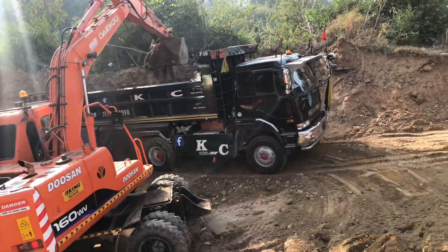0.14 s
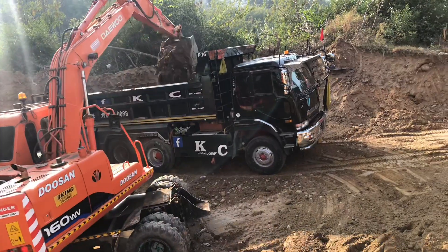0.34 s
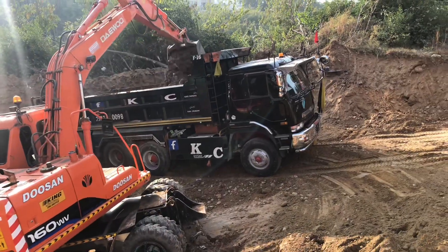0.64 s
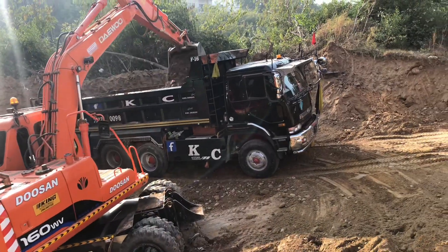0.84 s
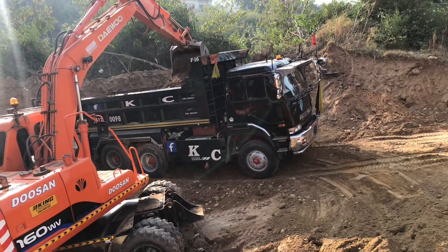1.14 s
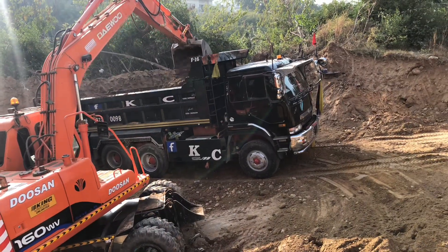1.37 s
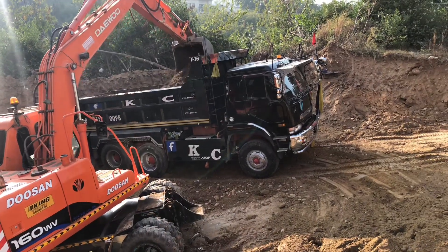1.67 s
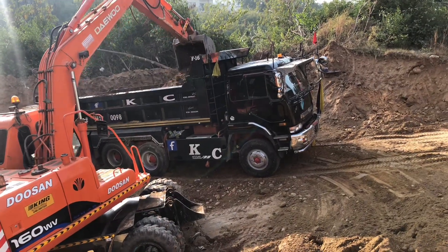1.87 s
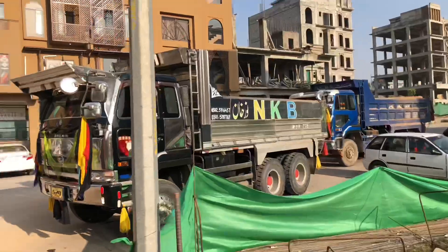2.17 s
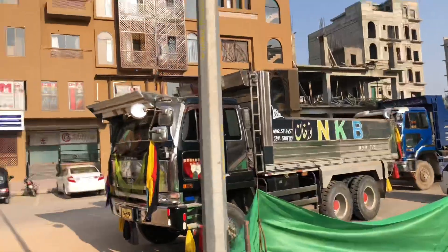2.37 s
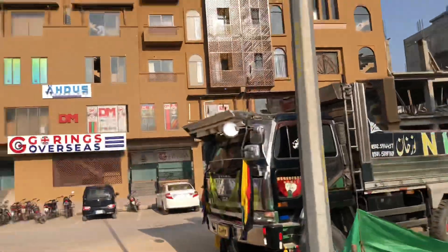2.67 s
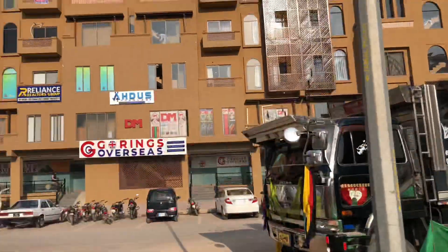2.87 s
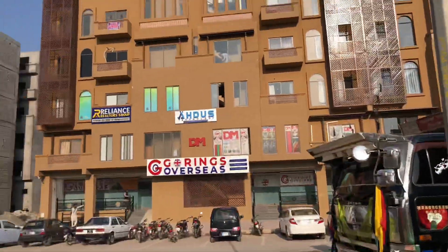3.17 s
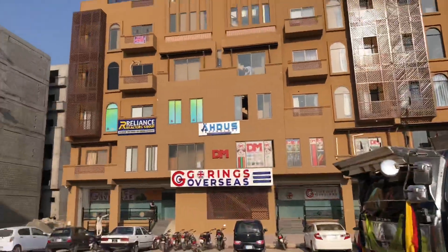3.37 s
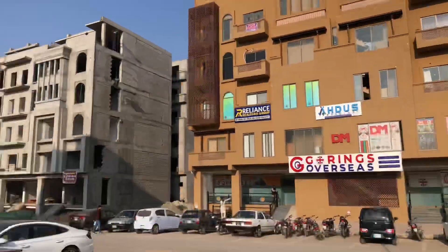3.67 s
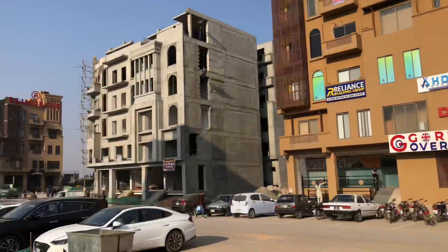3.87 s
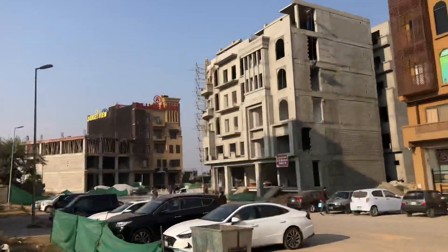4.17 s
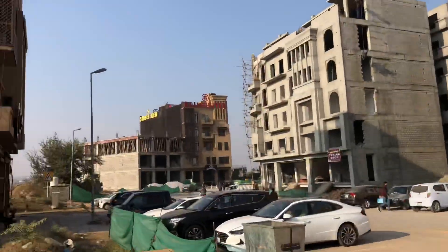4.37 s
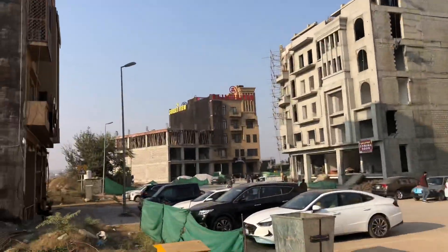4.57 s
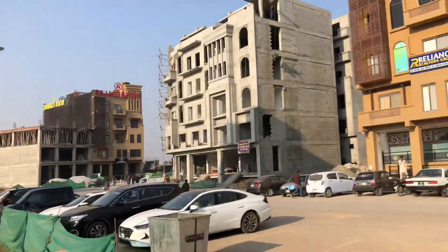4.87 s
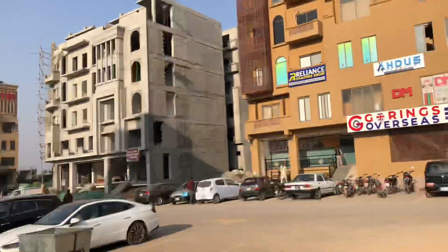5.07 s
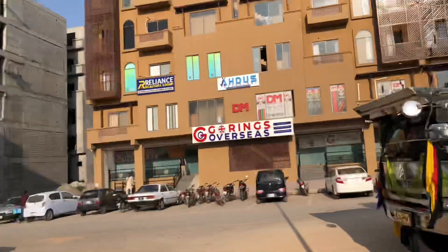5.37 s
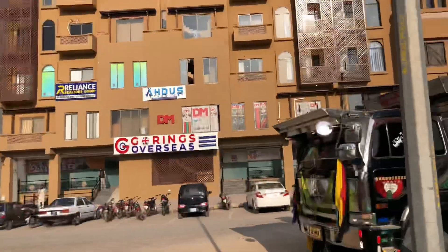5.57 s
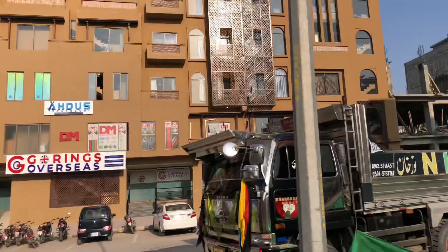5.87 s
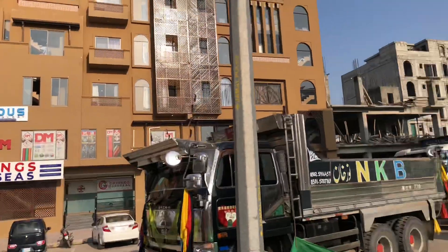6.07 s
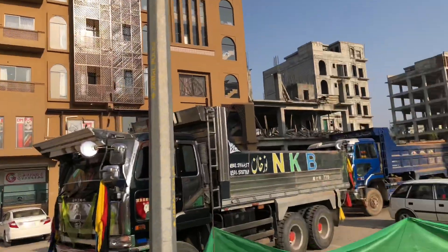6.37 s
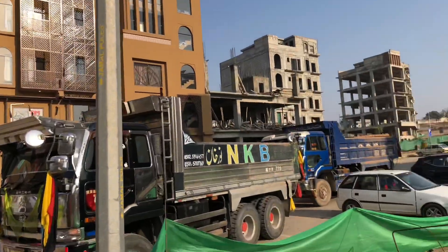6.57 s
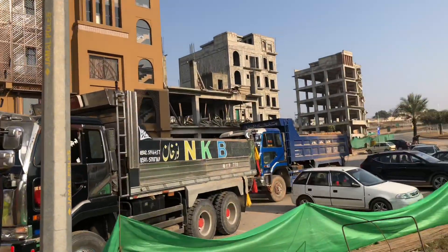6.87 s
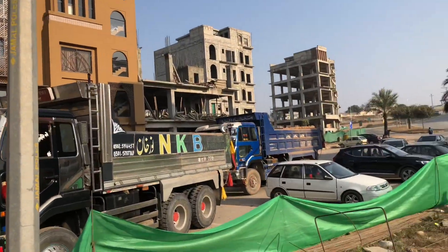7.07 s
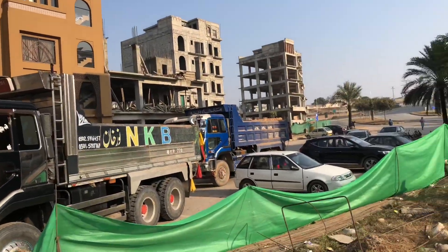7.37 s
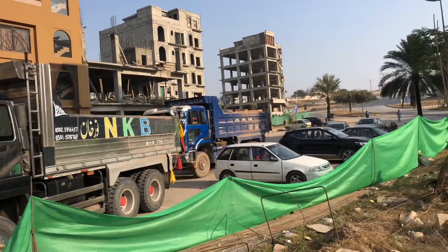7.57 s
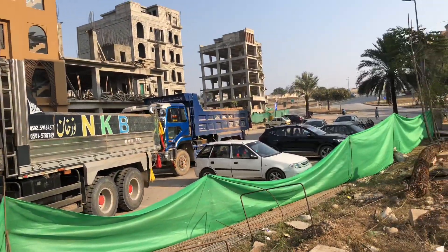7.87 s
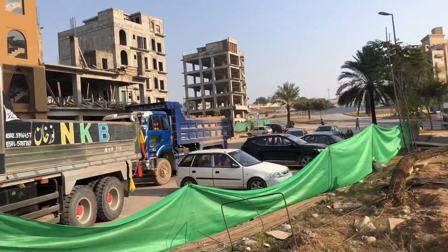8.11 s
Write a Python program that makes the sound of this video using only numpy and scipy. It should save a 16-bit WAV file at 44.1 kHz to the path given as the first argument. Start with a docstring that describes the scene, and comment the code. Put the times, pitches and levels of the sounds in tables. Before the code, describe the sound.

Outdoors at a digging site, a loud, hard-clattering excavator engine sags slightly as soil and rocks crash into a truck's metal bed, densest around one second. A hard cut follows. Then a more distant engine drones across a street, throbbing softly, beside another low motor that fades away. The turning microphone loses then regains the clatter, brightest near the end; thin hiss and small ticks stay faint behind.

```python
"""A wheeled excavator's six-cylinder diesel under load, close by, tips soil and stones into a steel truck bed.
After a very short silence the engine is heard from across a street, on a turning microphone.
Fluttering lines make exhaust, fan and hydraulic pump; noise bursts ringing the panels make the clatter,
which brightens as the microphone faces the machines. Decaying noise and modes make the falling load.
Behind are another motor that runs down and fades, a thin hiss, ticks, squeaks and a swell of clatter."""
import sys
import numpy as np
from scipy import signal
from scipy.fft import rfft, irfft, next_fast_len
from scipy.io import wavfile
from scipy.ndimage import uniform_filter1d, map_coordinates

SR = 44100
rng = np.random.default_rng(int(sys.argv[2]) if len(sys.argv) > 2 else 0)


def generate_wav(sig):
    """Save sig (samples, or channels by samples) to the path in sys.argv[1] as 16-bit PCM at SR."""
    pcm = np.round(np.clip(np.atleast_2d(sig).T, -1, 1) * 32767).astype(np.int16)
    wavfile.write(sys.argv[1], SR, pcm)


N = 363384
TIME = np.arange(N) / SR

# the two microphone places, close by and across the street: start_s, end_s
NEAR, FAR = (0, 2.013), (2.06, 8.24)

# engine speed, sagging under load and recovering: time_s, firing_rate_hz
SPEED_NEAR = [(0, 85.54), (.4, 83.92), (1.35, 80.86), (2.01, 83)]
SPEED_FAR = [(2.06, 84.4), (2.55, 84.86), (2.75, 80.53), (3.9, 80.95), (5.02, 84.2), (5.27, 80.6),
             (6, 81.44), (6.25, 82.63), (7.05, 82.3), (7.42, 83.4), (7.66, 81), (8.02, 82.6), (8.24, 85.5)]
# main lines close by: time_s, exhaust_db, fan_db, pump_db, sixth_order_db
LINES_NEAR = [(0, -39.5, -35, -54, -54), (.4, -44, -29.5, -33.5, -59), (.78, -43.5, -30, -33, -39),
              (1, -38, -34.5, -37, -39), (1.35, -34.5, -34.5, -34, -40), (1.6, -37.5, -36, -38.5, -47),
              (2.01, -41, -31, -34, -37)]
# main lines across the street: time_s, exhaust_db, fan_db, pump_db
LINES_FAR = [(2.06, -53, -50, -47.5), (2.52, -46.5, -57, -45.5), (2.75, -45, -43, -56.5),
             (3.3, -44, -43.5, -59), (3.95, -45, -55.5, -58), (4.65, -45.5, -39.5, -60.5),
             (5.05, -44, -40.5, -48), (5.45, -43, -38, -48), (5.85, -43, -44, -56.5),
             (6.4, -41, -36, -43.5), (6.92, -44, -41, -45), (7.12, -46, -46, -50), (7.5, -47, -42.5, -54.5),
             (7.78, -54, -50.5, -50.5), (8.24, -45, -44.5, -41.5)]
# sixth order across the street, before load and throb: time_s, level_db
SIXTH_FAR = [(2.06, -54.5), (4.7, -54.5), (5.3, -51), (8.24, -49.5)]
# weaker engine lines: multiple_of_firing_rate, level_db (across the street: level when faced squarely)
OVERTONES_NEAR = [(4, -48), (5, -50), (7, -62.5), (9, -49), (12, -61)]
OVERTONES_FAR = [(4, -65.5), (5, -59), (7, -57.5), (9, -58.5), (12, -65), (15, -59.5)]
# a steady higher hum: time_s, level_db
HUM_NEAR = [(0, -38), (.8, -50), (1.4, -37.5), (2.01, -41)]
HUM_FAR = [(2.06, -52.5), (3.2, -76), (4.6, -56.5), (5.702, -51), (8.24, -55)]
# rumble, boom, body, knock, clatter, hiss and air: low_hz, high_hz
BANDS = [(170, 230), (290, 450), (520, 950), (1050, 1600), (2000, 5000), (7000, 10000), (11500, 15500)]
# overall colour of the engine noise: pitch_hz, relative_level_db
COLOUR_NEAR = [(25, -31.5), (45, -18.5), (75, -7.5), (130, 1), (200, 0), (330, 5), (430, -5.5), (600, -3.5),
               (1000, -2.5), (2000, -9), (4000, -14.5), (8000, -26), (11000, -31.5), (15500, -37.5)]
COLOUR_FAR = [(24, -45), (42, -5.5), (70, -8), (110, -0.5), (180, -1.5), (280, -6), (420, -8), (600, -13),
              (1300, -11.5), (2200, -15), (4800, -24), (6000, -30), (11000, -43), (13000, -50.5)]
# ringing engine panels: pitch_hz, width_hz, rise_above_colour_db
PANELS_NEAR = [(597, 24, 13), (830, 14, 6.5), (914, 20, 6), (1183, 19, 2), (1200, 25, 4.5), (1748, 12, 10),
               (2720, 40, 5), (2850, 120, 2.5), (3420, 57, 2.5), (3630, 120, -1.5), (4260, 92, 4.5)]
PANELS_FAR = [(304, 5.7, 3.7), (786, 11, 4.4), (967, 4.7, 1), (1110, 31, 1.8), (1742, 13, 5.1),
              (1860, 12, 2), (2430, 40, 1.7), (3660, 210, 2.6), (6370, 73, 3.1)]
# one row per band: level_db at no flow or facing away, gain_db at full flow or facing, curvature
REGISTERS_NEAR = [(-40, -1.5, 1), (-37.5, 1, .8), (-35.5, 0, 0.69), (-39, 3, 0.5), (-39, 4.5, 1.2),
                  (-49.5, 12, 2.1), (-55, 10.5, .8)]
REGISTERS_FAR = [(-52.5, 5.5, 2), (-55.5, 5.4, 0.86), (-55, 5.9, 0.48), (-57.5, 5.7, 0.53), (-58, 9.3, 1.1),
                 (-76.5, 19.3, 1.43), (-85, 20, 1.9)]
# how much soil is sliding from the bucket: time_s, flow (0-1)
POUR = [(0, .9), (.25, 0.59), (.7, 0.71), (1, 0.77), (1.2, 0.46), (1.55, 0.26), (2.01, 0.2)]
# how squarely the turning microphone faces the machines: time_s, facing (0-1)
FACING = [(2.06, 0.39), (2.3, 0.34), (2.652, 0.09), (3.6, 0), (4.4, 0), (5.1, 0.01), (5.9, 0.38),
          (6.9, 0.79), (7.5, 0.83), (7.95, 0.97), (8.24, 0.88)]
# stones striking stones and the bucket: start_s, level_db, pitch_hz
STONES = [(.002, -14.5, 8030), (.0315, -11, 4180), (.0558, -14, 7500), (.137, -21, 9000), (.375, -22, 9550),
          (0.612, -14.5, 4660), (0.6423, -12.5, 8560), (.786, -11.5, 9604), (0.7931, -6.5, 5610),
          (0.9362, -14.5, 6480), (.945, -12.5, 4700), (0.9654, -13.5, 4450), (1.0216, -16, 3560),
          (1.059, -21, 5200), (1.154, -22, 6980), (1.648, -39, 8000), (1.7983, -23, 7830)]
# clods landing in the truck bed: start_s, level_db, pitch_hz, t60_s
CLODS = [(.577, -18.5, 260, 0.17), (.6125, -21, 650, 0.31), (.797, -15.5, 2180, 0.17),
         (.858, -20, 597, 0.21), (.876, -18, 477, 0.23), (.964, -6, 1130, 0.073), (.973, -14, 550, .13),
         (1.002, -25, 650, 0.082), (1.022, -13.5, 740, 0.13), (1.032, -18, 2400, 0.28),
         (1.1021, -16, 1898, 0.15), (1.109, -13.5, 251, .18), (1.1494, -18.5, 2000, 0.13),
         (1.158, -13.5, 210, 0.26), (1.178, -22, 183, .5), (1.21, -18.5, 444, 0.2),
         (1.3589, -25, 2203, 0.22), (1.6504, -19.5, 2660, 0.078), (1.99, -22.5, 560.4, .12)]
# modes of the steel truck bed: pitch_hz, relative_level_db, t60_s
BED = [(184.3, 1, 0.35), (221, 0, .25), (364, -14, .18), (453, -4.5, 0.43), (537, 2, 0.24),
       (600, 4.5, 0.25), (625, -1.5, 0.32), (794, -4, .22), (997, -1.5, 0.21), (1726, -3.5, .14),
       (2130, -3, .14), (2630, -12, .2), (2864, -4, .3), (3310, -12, .25), (3650, -6.5, .1)]
# a thin hiss, perhaps a hydraulic valve, swells and fades: peak_s, level_db
WHISTLES = [(3.35, -72.5), (5.35, -71.5), (7, -67)]
# resonances of the thin hiss: pitch_hz, width_hz, relative_level_db
WHISTLE_BANDS = [(5004, 670, 5.5), (6480, 180, 0.5), (12500, 1900, -8)]
# ticks, squeaks and a swell of clatter in the street: peak_s, level_db, pitch_hz, width_hz, length_s
STREET_NOISES = [(2.332, -58, 5600, 1200, .006), (2.821, -58.5, 2880, 700, 0.38),
                 (4.94, -70, 8500, 2000, .008), (6.542, -57, 4900, 70.2, 0.017),
                 (7.929, -49, 3995, 1099, .04), (8.184, -54, 8600, 1102, .04)]

FAN_RATIO = 1.868  # belt drive: blade passes per firing
HUM_NEAR_HZ, HUM_FAR_HZ, HUM_DRIFT_HZ = 370, 379.5, 1.2
SIXTH_LOAD_DB_PER_HZ = 1.4  # louder as the engine is pulled down
# throb of the sixth order; its rate is the one at the peak
THROB_PEAK_S, THROB_HZ, THROB_SLOWING_HZ_PER_S = 2.862, 1.9, 0.197
THROB_BEAT = 0.44  # size of the beating part against the steady part
# a nasal engine rasp from one side of the street, loudest when faced
RASP_HZ, RASP_WIDTH_HZ, RASP_DB, RASP_FACED_S, RASP_PASS_S = 1280, 210, -51, 6.83, 0.78
STONE_T60_S = 0.058
CLOD_THUD_DB, BED_RING_DB = -1, -14.5  # added to each clod's level
# loose gravel: lowest level, spread of levels, lowest pitch, ratio of highest to lowest pitch
GRAVEL_DB, GRAVEL_SPREAD_DB, GRAVEL_LOW_HZ, GRAVEL_RANGE = -33, 3, 1990, 3.3
# another motor in the street: shaft rate when the street is first heard, and where its fade begins
MOTOR_HZ, MOTOR_SAG_HZ_PER_S, MOTOR_DB = 24.05, 1.1, -50
MOTOR_STOP_S, MOTOR_FADE_DB_PER_S = 3.72, 45
WHISTLE_S = 0.21  # length of each swell
EDGE_HZ = 15850  # upper limit of the recorder


def near_machine():
    """Close by: exhaust, pump, fan with overtones and hard diesel clatter, brightened by sliding soil."""
    turns = np.cumsum(follow(SPEED_NEAR)[0]) / SR  # counted in firings
    blades = FAN_RATIO * turns
    exhaust_db, fan_db, pump_db, sixth_db = follow(LINES_NEAR)
    lines = tone(turns, exhaust_db, rough=0.23)
    lines += tone(3 * turns, pump_db, rough=0.26)
    lines += tone(6 * turns, sixth_db, rough=0.14)
    lines += overtones(turns, OVERTONES_NEAR, rough=0.44)
    lines += tone(blades, fan_db, rough=0.23)
    lines += tone(2 * blades, fan_db - 16, rough=0.63)
    lines += tone(3 * blades, fan_db - 13.5, rough=0.12)
    lines += hum(HUM_NEAR_HZ, HUM_NEAR, rough=0.35)
    drive = combustion(turns, knock=0.18, repeat=0.64, uneven=2.2, width=0.39)
    return lines + roar(drive, REGISTERS_NEAR, POUR, COLOUR_NEAR, PANELS_NEAR, patchy_db=0.5, flicker_db=0.5)


def far_machine():
    """From across the street the same lines carry, over softer clatter that follows the microphone's facing."""
    hz, facing = follow(SPEED_FAR)[0], follow(FACING)[0]
    turns = np.cumsum(hz) / SR
    blades = FAN_RATIO * turns
    exhaust_db, fan_db, pump_db = follow(LINES_FAR)
    lines = tone(turns, exhaust_db, rough=0.17)
    lines += tone(3 * turns, pump_db, rough=0.21)
    sixth_db = follow(SIXTH_FAR)[0] + SIXTH_LOAD_DB_PER_HZ * (np.median(hz) - hz)
    lines += throb() * tone(6 * turns, sixth_db, rough=0.096)
    panel_db = np.interp(hz, [83, 84.3], [-68, -51])  # a panel booms at the higher speed
    lines += tone(4 * turns, panel_db, rough=0.16)
    lines += amp(9.8 * (facing - 1.0)) * overtones(turns, OVERTONES_FAR, rough=0.66)
    lines += tone(blades, fan_db, rough=0.12)
    lines += tone(2 * blades, fan_db - 20.0, rough=0.45)
    lines += hum(HUM_FAR_HZ, HUM_FAR, rough=0.05)
    drive = combustion(turns, knock=0.073, repeat=0.44, uneven=1.9, width=0.51)
    lines += rasp(combustion(turns, knock=0.33, repeat=0.75, uneven=2, width=0.3))
    return lines + roar(drive, REGISTERS_FAR, FACING, COLOUR_FAR, PANELS_FAR, patchy_db=1.0, flicker_db=0.35)


def combustion(turns, knock, repeat, uneven, width):
    """A burst of noise per firing; six unequal cylinders, and part of the clatter recurs every cycle."""
    cylinder = turns.astype(int) % 6
    force_db = uneven * evened(np.array([0.29, -1, 0, 1.0, -2, 0.83]))
    force = amp(force_db)[cylinder]
    burst = evened(force * np.exp(-(turns % 1) / width))
    cycle = rng.standard_normal(round(SR * 6 / 82))  # one cycle at 82 firings a second
    recurring = cycle[(turns / 6 % 1 * len(cycle)).astype(int)]
    noise = rng.standard_normal(N) + repeat * recurring
    return evened(noise * (1 + knock * burst))


def roar(drive, rows, control, colour, panels, patchy_db, flicker_db):
    """The drive rings the engine panels; the control sets how much of each register arrives."""
    hz, t, z = signal.stft(drive, SR, nperseg=2048, noverlap=1536)
    log_hz = np.log(hz + 1)
    f, db = np.transpose(colour)
    colour_db = np.interp(log_hz, np.log(f), db)
    panel_db = sum(rise / (1 + (2 * (hz - centre) / width) ** 2) for centre, width, rise in panels)
    body = amp(colour_db + panel_db)
    # level the body already has in each band, to be replaced by the register levels
    in_band = [body[(hz > low) & (hz < high)] for low, high in BANDS]
    own_db = np.array([10 * np.log10(np.sum(part ** 2) / len(hz)) for part in in_band])
    # cross-fade between neighbouring band centres
    centres = np.log(BANDS).mean(1)
    blend = np.array([np.interp(log_hz, centres, row) for row in np.eye(len(BANDS))])
    field_db = blend.T @ (registers(rows, follow(control, t)[0]) - own_db[:, None])
    field_db += 1.4 * reflections(hz, t)
    patches = uniform_filter1d(rng.standard_normal(z.shape), size=24, axis=0)
    patches = evened(uniform_filter1d(patches, size=7, axis=1))
    spectrum = z * body[:, None] * amp(field_db + patchy_db * patches)
    out = signal.istft(spectrum, SR, nperseg=2048, noverlap=1536)[1][:N]
    return out * amp(flicker_db * wander(25))


def registers(rows, control):
    """Level of each band over time: all follow one control, each by its own amount."""
    control = np.maximum(control, 1e-3)
    return np.array([db + gain_db * control ** curvature for db, gain_db, curvature in rows])


def reflections(hz, t, spacing_hz=35, drift_s=0.6):
    """Echoes from ground and walls: random, drifting peaks and dips across the spectrum."""
    grid = rng.standard_normal((round(hz[-1] / spacing_hz) + 2, round(t[-1] / drift_s) + 2))
    places = np.meshgrid(hz / spacing_hz, t / drift_s, indexing="ij")
    return evened(map_coordinates(grid, places, order=1))


def overtones(turns, rows, rough):
    """Weak higher lines at multiples of the firing rate, fluttering at random."""
    return sum(tone(round(k) * turns, db, rough, flutter_hz=4) for k, db in rows)


def hum(hz, levels, rough):
    """A line that drifts slightly about one pitch."""
    turns = np.cumsum(hz + HUM_DRIFT_HZ * wander(2)) / SR
    return tone(turns, follow(levels)[0], rough)


def throb():
    """Gain of a slowing throb: a beat against a steady part gives rounded swells and deep gaps."""
    t = TIME - THROB_PEAK_S
    beat = np.exp(2j * np.pi * (THROB_HZ * t - THROB_SLOWING_HZ_PER_S * t ** 2 / 2))
    return (abs(1 + THROB_BEAT * beat) / (1 + THROB_BEAT)) ** 3


def rasp(drive):
    """Mid-range engine clatter that swells as the microphone sweeps past it."""
    nasal = evened(shaped(drive, lambda f: np.exp(-((f - RASP_HZ) / RASP_WIDTH_HZ) ** 2 / 2)))
    return amp(RASP_DB) * nasal * np.exp(-((TIME - RASP_FACED_S) / RASP_PASS_S) ** 2 / 2)


def load():
    """Stones clack, clods thud into the ringing bed, and loose gravel trickles with the flow of soil."""
    out = np.zeros(N)
    for s, db, hz in STONES:
        add(out, s, clack(db, hz, STONE_T60_S))
    for s, db, hz, t60 in CLODS:
        add(out, s, impact(db + CLOD_THUD_DB, hz, t60, octaves=0.93, skirt_db=-14, grit=5.0))
        add(out, s, amp(db + BED_RING_DB) * bed_ring(hz))
    # random candidates, kept more often while the flow is strong
    for chance, size, pitch, when in rng.random((70, 4)):
        s = when * NEAR[1]
        if chance < follow(POUR, s)[0]:
            db = GRAVEL_DB + GRAVEL_SPREAD_DB * size
            add(out, s, clack(db, GRAVEL_LOW_HZ * GRAVEL_RANGE ** pitch, t60=0.035))
    return out


def clack(db, hz, t60):
    """A stone: a gritty crack and a handful of short modes around its own pitch."""
    t = np.arange(SR // 3) / SR
    pitch, phase = rng.standard_normal((2, 7, 1))
    mode_hz = hz * 2 ** (0.38 * np.tanh(pitch))
    modes = np.sin(2 * np.pi * (mode_hz * t + phase)).sum(0)
    ring = amp(db - 13 - 60 * t / t60) * evened(modes)
    return ring + impact(db - 4.5, hz, 0.86 * t60, octaves=0.79, skirt_db=-14.0, grit=2.4)


def impact(db, hz, t60, octaves, skirt_db, grit):
    """A crumbling blow: a fast-dying cluster of tiny contacts, coloured by the size of the lump."""
    t = np.arange(SR // 3) / SR
    noise, sizes = rng.standard_normal((2, len(t)))

    def colour(f):
        """A hump around the pitch on a broad skirt."""
        hump = np.exp(-(np.log2((f + 1) / hz) / octaves) ** 2 / 2)
        return hump + amp(skirt_db) * f / (f + hz) / (1 + f / (4 * hz))

    contacts = evened(shaped(noise * amp(grit * sizes), colour))
    onset = 1 - np.exp(-t / 0.00026)
    return amp(db) * contacts * amp(-60 * t / t60) * onset / 2


def bed_ring(hz):
    """Steel bed modes: a big soft lump wakes the low ones, a hard one the high ones."""
    t = np.arange(SR // 2) / SR
    ring = np.zeros(len(t))
    for f, mode_db, t60 in BED:
        level_db = mode_db - 3 * np.log2(f / hz) ** 2  # weaker away from the blow's pitch
        ring += amp(level_db - 60 * t / t60) * np.sin(2 * np.pi * f * t)
    return ring


def motor():
    """Another motor in the street: two neighbouring shaft orders sink in pitch as it slows, then fade."""
    turns = np.cumsum(MOTOR_HZ - MOTOR_SAG_HZ_PER_S * (TIME - FAR[0])) / SR
    db = MOTOR_DB - MOTOR_FADE_DB_PER_S * np.maximum(TIME - MOTOR_STOP_S, 0)
    return tone(6 * turns, db, rough=0.17) + tone(5 * turns, db - 2.0, rough=0.13)


def street():
    """Thin whistling hiss, ticks, squeaks and a swell of clatter, all made of swelling bands of noise."""
    out = sum(hiss(*row) for row in STREET_NOISES)
    for s, db in WHISTLES:
        for hz, width, band_db in WHISTLE_BANDS:
            out += hiss(s, db + band_db, hz, width, WHISTLE_S)
    return out


def hiss(s, db, hz, width, length):
    """A band of noise that swells and fades, bell-shaped in pitch and in time."""
    fizz = evened(shaped(rng.standard_normal(N), lambda f: np.exp(-((f - hz) / width) ** 2 / 2)))
    return amp(db) * fizz * np.exp(-((TIME - s) / length) ** 2 / 2)


def tone(turns, db, rough, flutter_hz=14):
    """A line that flutters in size and phase."""
    size = 1 + rough * wander(flutter_hz)
    phase = 2 * np.pi * turns + rough * wander(flutter_hz)
    return np.sqrt(2) * amp(db) * size * np.sin(phase)


def wander(hz):
    """Slow chance of rms 1, up to a rate."""
    knots = signal.resample_poly(rng.standard_normal(800), 8, 1)
    return evened(np.interp(TIME * hz * 16, np.arange(len(knots)), knots))


def amp(db):
    """Decibels to gain."""
    return 10 ** (np.asarray(db) / 20)


def evened(x):
    """Scales to rms 1."""
    return x / np.sqrt(np.mean(x ** 2) + 1e-20)


def follow(rows, t=TIME):
    """Reads each column of a curve at the given times."""
    s, *columns = np.transpose(rows)
    return [np.interp(t, s, column) for column in columns]


def add(mix, s, sound):
    """Mixes a sound in at a time."""
    part = mix[max(round(s * SR), 0):][:len(sound)]
    part += sound[:len(part)]


def shaped(x, gain):
    """Filters by a gain that is a function of frequency."""
    size = next_fast_len(len(x))
    return irfft(rfft(x, size) * gain(np.fft.rfftfreq(size, 1 / SR)), size)[:len(x)]


def low_cut(x, hz):
    """Takes away the rumble below a corner frequency."""
    return shaped(x, lambda f: 1 / np.sqrt(1 + (hz / (f + 1)) ** 8))


def during(span):
    """Opens and shuts abruptly around a stretch of time."""
    is_open = (TIME >= span[0]) & (TIME <= span[1])
    return uniform_filter1d(is_open.astype(float), size=60)


def scene():
    """The loading place close by, a short silence, then the view from across the street."""
    near = low_cut(near_machine() + load(), 52)
    far = low_cut(far_machine() + motor() + street(), 36)
    return (near * during(NEAR) + far * during(FAR))[None]


def record(dry):
    """The recorder's band limit: a steep low-pass."""
    low_pass = signal.firwin(511, EDGE_HZ, window=("kaiser", 9), fs=SR)
    return signal.oaconvolve(dry, low_pass[None], "same")


dry = scene()
out = record(dry)
generate_wav(out)
```